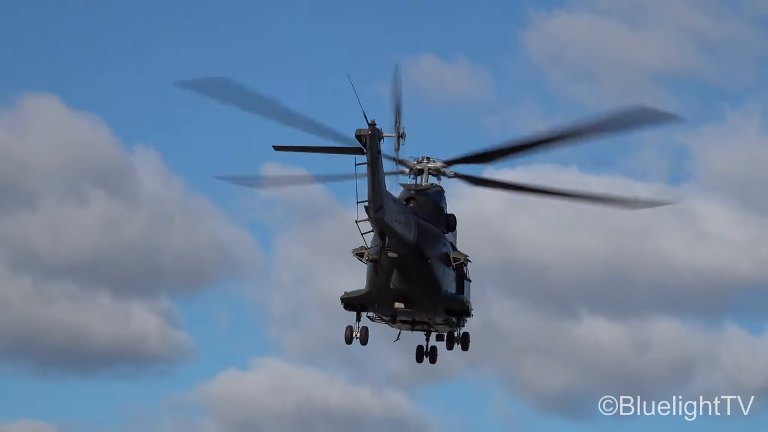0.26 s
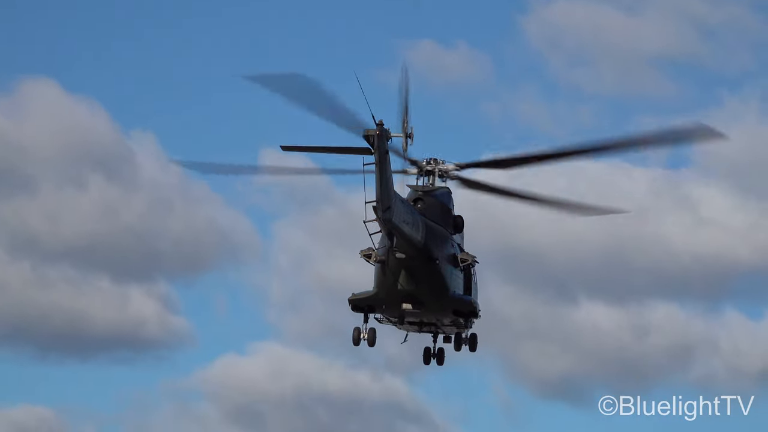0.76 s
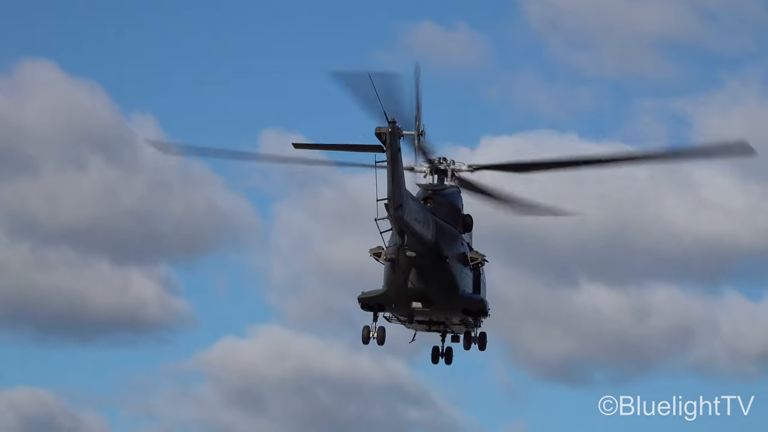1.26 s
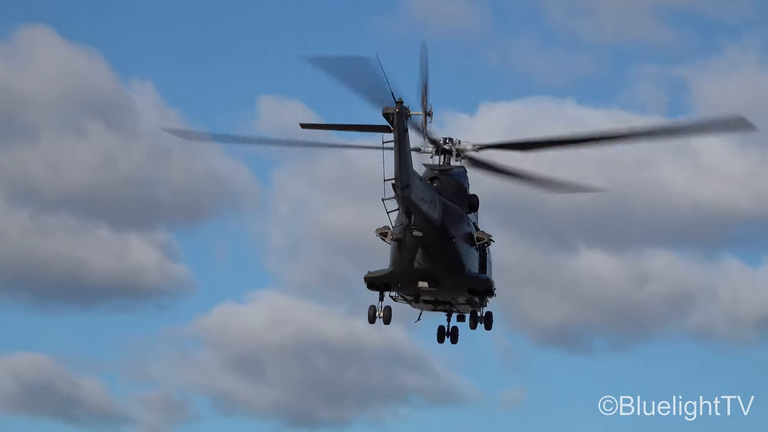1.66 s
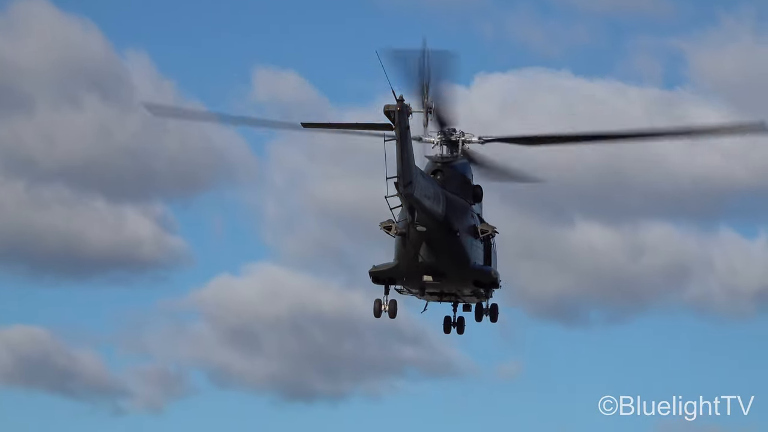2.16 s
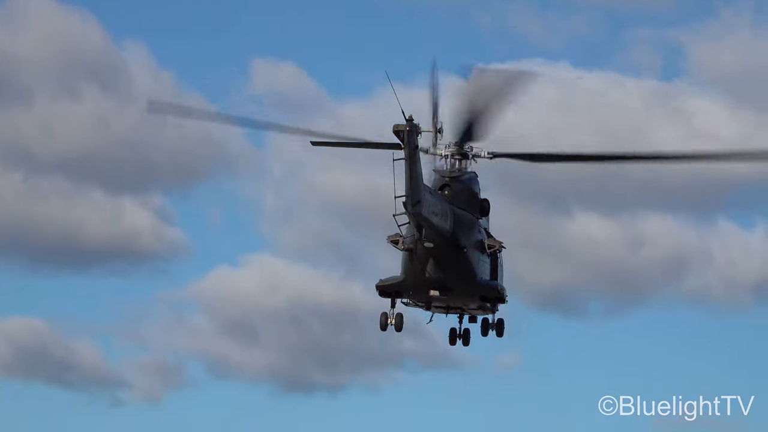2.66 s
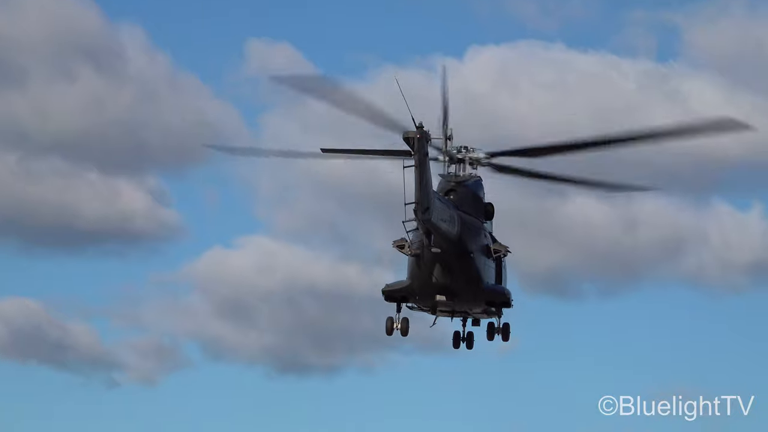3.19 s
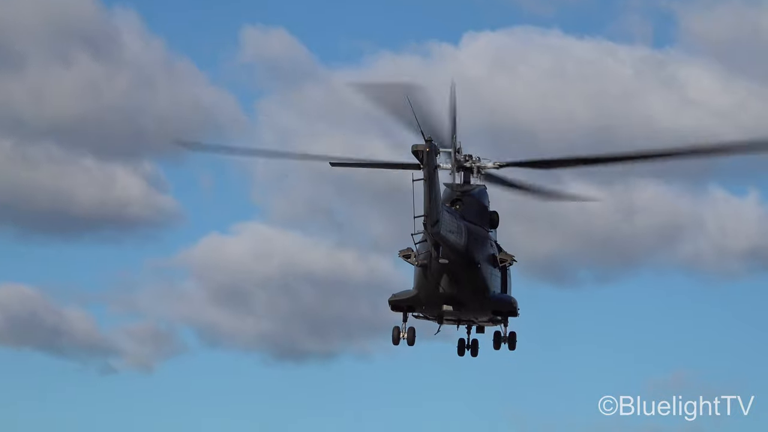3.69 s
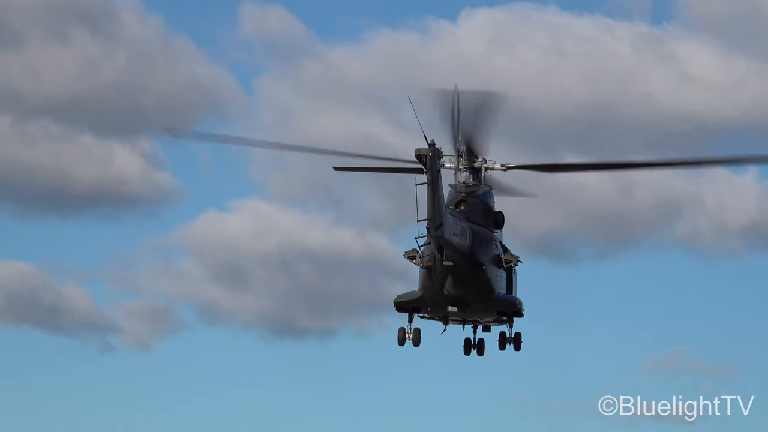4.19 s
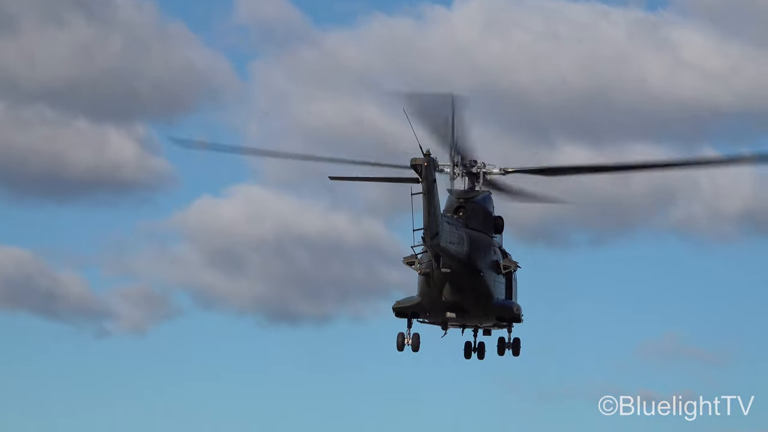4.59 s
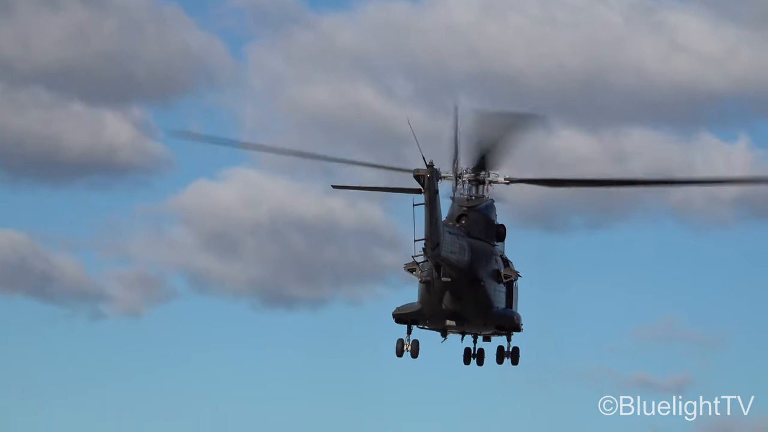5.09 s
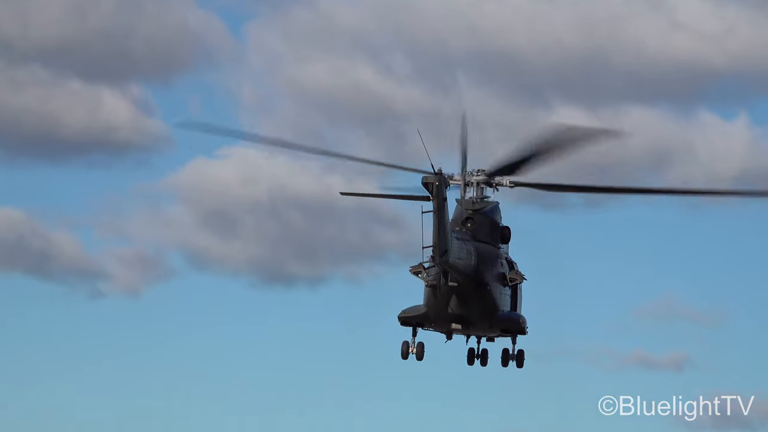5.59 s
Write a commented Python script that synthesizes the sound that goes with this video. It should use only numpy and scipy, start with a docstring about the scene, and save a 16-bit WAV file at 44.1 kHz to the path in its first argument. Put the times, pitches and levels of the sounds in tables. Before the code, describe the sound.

A large helicopter hovers low over open ground for about six seconds and slowly draws nearer. It starts with a breathy mid-range rotor rush pulsing nearly eighteen times a second, dipping in level and choking in tiny dropouts around 0.2-0.4 s. From 0.6 s hollow, knocking blade slaps join the beat, firm around 1-1.3 s, sparse around 1.5-1.9 s, loudest at 2.1-2.3 s, fading out by 2.6 s. Afterwards the roar is smoother, fuller and less deeply chopped, rising to its loudest at the end. Blurred gearbox and tail rotor whines waver inside it; a thin, breathy turbine whistle near 2.3 kHz grows more noticeable after 2.9 s, especially around 4.1 s. A dull ground echo colours the sound. Throughout, downwash batters the stereo microphones with uneven, saturated deep rumbles and thumps. Two more brief dropouts come near 4.7 and 4.85 s.

```python
"""Over an open field a helicopter hovers low and draws nearer. Rotor rush is banded noise that swells with each blade;
tail rotor and gearbox whine as noise in narrow resonances, and a thin turbine whistle wavers with them.
Some blades slap a tip vortex: pulsed bursts ring through resonances. The ground adds a dull echo.
Downwash rumbles on the microphone ports as saturated low noise. The aircraft drops out for brief dips at set
times where the capsules choke, and a limiter holds the loudest peaks."""
import sys
import numpy as np
from scipy import signal
from scipy.io import wavfile
from scipy.ndimage import uniform_filter1d, minimum_filter1d

SR = 44100
rng = np.random.default_rng(int(sys.argv[2]) if len(sys.argv) > 2 else 0)


def put_to_file(sound):
    """Save the sound as 16-bit audio at rate SR, in the file named by the first command-line argument."""
    columns = np.atleast_2d(sound).T  # one column per channel
    safe = np.clip(columns, -1, 1)
    whole_steps = np.round(safe * 32767)
    wavfile.write(sys.argv[1], SR, whole_steps.astype(np.int16))


N = 257984   # length in samples


def from_db(db):
    """Level in dB to amplitude factor."""
    return 10 ** (np.asarray(db) / 20)


def rms_one(x):
    """Scale to an rms of 1."""
    return x / np.sqrt(np.mean(x ** 2) + 1e-20)


def in_time(rows):
    """Draw each column of a timed table as a line through its points, one value per sample."""
    times_s, *columns = np.transpose(rows)
    return [np.interp(np.arange(N) / SR, times_s, column) for column in columns]


def at_hz(points, hz):
    """Read a frequency table at hz, on a logarithmic frequency axis."""
    table_hz, values = np.array(points).T
    return np.interp(np.log(hz), np.log(table_hz), values)


def drift(corner_hz):
    """Slow chance with spread 1: coarse noise through two equal one-pole low-passes."""
    step = 40   # samples between coarse points
    pole = np.exp(-2 * np.pi * corner_hz * step / SR)
    coarse = rng.standard_normal(N // step + 2002)
    slow = signal.lfilter([1], [1, -2 * pole, pole * pole], coarse)[2000:]   # settled part
    return np.interp(np.arange(N) / step, np.arange(len(slow)), rms_one(slow))


def resonate(x, hz, width_hz):
    """Two-pole resonance with gain 1 on top."""
    r = np.exp(-np.pi * width_hz / SR)
    feedback = [1, -2 * r * np.cos(2 * np.pi * hz / SR), r * r]
    return signal.lfilter([(1 - r * r) / 2, 0, (r * r - 1) / 2], feedback, x)


# How alike left and right are: f/Hz, likeness [0 unrelated to 1 identical]
STEREO_LIKENESS = [(15, 0.94), (60, 0.93), (125, 0.73), (220, 0.51), (320, 1), (450, 0.99), (800, 0.99),
                   (1500, 0.99), (2500, 0.94), (4500, 0.76), (8000, 0.53), (11000, 1), (14000, .97)]


def bands(spectrum, edges):
    """Yield centre Hz and a stereo noise band shaped by the spectrum; all bands together have rms 1."""
    centres = np.sqrt(edges[1:] * edges[:-1])
    gains = from_db(at_hz(spectrum, centres)) * np.sqrt(np.diff(edges))
    gains = gains / np.sqrt(np.sum(gains ** 2))
    white = rng.standard_normal((2, 2, N + SR // 2))   # neighbouring bands get unrelated noise
    for k, hz in enumerate(centres):
        sos = signal.butter(2, edges[k:k + 2], "band", fs=SR, output="sos")
        mid, side = signal.sosfilt(sos, white[k % 2])[:, SR // 2:]
        alike = np.clip(at_hz(STEREO_LIKENESS, hz), 0, 1)
        pair = np.sqrt(1 + alike) * mid + np.sqrt(1 - alike) * side * [[1], [-1]]
        yield hz, rms_one(pair) * gains[k]


BLADE_HZ, FIRST_BLADE_S = 17.64, 0.0004   # blade passages per second, start of the first
BEAT_PEAK, BEAT_SHARPNESS = 0.1, 3.5   # where in the passage the swell peaks (share), how pointed it is


def blade_beat():
    """A short swell at every blade passage, each blade with its own strength; mean 0, rms 1."""
    # the extra 1.5 turns put each swell mid-turn, so strength changes in the trough
    turns = (np.arange(N) / SR - FIRST_BLADE_S) * BLADE_HZ - BEAT_PEAK + 1.5
    strength = rng.uniform(.7, 1.3, int(turns[-1]) + 2)
    swell = np.exp(-BEAT_SHARPNESS * (1 + np.cos(2 * np.pi * turns)))
    swell = swell * strength[turns.astype(int)]
    return rms_one(swell - swell.mean())


TAIL_BLADE_HZ, TAIL_CHOP_DB = 106.4, 1.0   # tail blade passages per second, peak swing they give the treble
# Colour of blade and exhaust noise: f/Hz, relative level/dB per Hz
RUSH_SPECTRUM = [(130, -30), (220, -1.5), (300, 1), (450, -1.5), (650, -5), (780, -0.5), (950, -2.5),
                 (1300, -6), (1700, -11), (2200, -12), (3000, -18), (4800, -21), (6500, -25.5), (8500, -36),
                 (10000, -47), (12000, -51), (15500, -83)]
# Depth of the blade beat: t/s, level/dB (twice the rms swing; the treble swings less)
BEAT_DEPTH = [(0, 4), (.4, 2.5), (.7, 4), (1.0, 4.5), (1.3, 3.5), (1.7, 2), (2.2, 3.5), (2.9, 1.5),
              (4.5, 1.2), (4.75, 1.5), (5.2, 1), (5.85, 0)]


def rush(bright_db, roar_db, top_db, patchy_db):
    """Broad noise of blades and exhaust, beating with the blades and flickering in the moving air."""
    [depth_db] = in_time(BEAT_DEPTH)
    beat, together, swells, out = blade_beat(), drift(43), drift(4.3), 0
    # the tail blades chop the hiss, at a slightly wandering phase
    tail = np.sin(2 * np.pi * TAIL_BLADE_HZ * np.arange(N) / SR + 1.7 * drift(0.88))
    for hz, noise in bands(RUSH_SPECTRUM, edges=200 * 2 ** np.arange(0, 6.4, .4)):
        # share of this band in the treble, the low roar and the top hiss
        treble = np.clip(np.log2(hz / 1200), 0, 2) / 2
        roar = np.exp(-(np.log2(hz / 620) / .35) ** 2)
        top = np.clip(np.log2(hz / 5500) / .6, 0, 1)
        beating_db = (1 - 0.69 * treble) * depth_db * beat / 2 + TAIL_CHOP_DB * treble * tail
        flicker_db = patchy_db * (0.96 * together + drift(25.0) + treble * swells)
        colour_db = treble * bright_db + roar * roar_db + top * top_db
        out = out + noise * from_db(beating_db + colour_db + flicker_db)
    return out


# Whine of tail rotor and gearbox: f/Hz, width/Hz of the narrower resonance, relative level/dB among the tones
WHINES = [(231, 14, -23), (350, 20, -18), (470, 7, -18), (1390, 10, -27), (1476, 8, -28), (1920, 14, -30),
          (2330, 260, -28), (8800, 900, -34), (590, 40, -15), (705, 25, -20), (1254, 24, -24),
          (4663, 270, -27.5), (7600, 500, -38)]


def tones(fading_db):
    """Each tone is noise in a narrow resonance; it wavers and fades on its own in the turbulent air."""
    out = 0
    for hz, width_hz, level_db in WHINES:
        narrow = resonate(rng.standard_normal(N), hz, width_hz)
        tone = resonate(narrow, hz, 3 * width_hz)
        out = out + from_db(level_db + fading_db * drift(1.46)) * rms_one(tone)
    return out


WHINE_DB = -0.5   # trim of all tones against the rush
# The aircraft draws nearer: t/s, rush level/dB, brightness/dB, low roar/dB, top hiss/dB
ROTOR_COURSE = [(0, -33.5, -0.5, -4, 6), (0.2, -38, -2.5, 2, -6), (0.33, -41.5, -1, 2, 4.5),
                (0.5, -37, 1.5, -2, -6), (0.7, -36, 0.5, 0.5, -8), (1.0, -34, -1.5, -0.5, -1),
                (1.25, -32, 0.5, -6, -2), (1.45, -34, 0.5, 0, -3), (1.57, -36, 2.5, 2, -4),
                (1.75, -34.5, 1.5, 1, -2), (2.1, -30.5, -2.5, -2.5, -3), (2.55, -33, 2, 3, -10),
                (2.9, -31, 1.1, 1.5, -2), (3.35, -32, -0.3, -1.5, -2.5), (3.5, -31, 0, -3, -1),
                (3.65, -30.5, 3, -2, -1.5), (3.88, -30.5, 0, 1, -8), (4.17, -28.5, 1, 3, 1),
                (4.4, -29, 2, -1, -8), (4.63, -29, 4.5, 2.5, -7), (4.72, -32.5, 0.5, -2.5, -5.5),
                (5.2, -30.5, -0.8, -0.5, -1), (5.5, -28, 1, -1, -6), (5.85, -27, -2, 1, 5)]


def rotor():
    """Rush and tones rise and fall on one level; the tones also swell with the low roar."""
    rush_db, bright_db, roar_db, top_db = in_time(ROTOR_COURSE)
    broad = rush(bright_db, roar_db, top_db, patchy_db=.8)
    whine = from_db(WHINE_DB + roar_db) * tones(fading_db=2.5)
    return from_db(rush_db) * (broad + whine)


TURBINE_HZ, TURBINE_WIDTH_HZ = 2323, 30   # pitch, width of the narrower resonance
# Turbine whistle, before its random waver: t/s, level/dB
WHISTLE_LEVEL = [(0, -60), (.5, -61), (1.2, -56), (1.6, -58), (2.0, -53), (2.3, -55), (2.6, -60),
                 (2.9, -51), (3.3, -56), (3.5, -52), (3.8, -49), (3.95, -52), (4.12, -47), (4.4, -52),
                 (4.55, -49), (4.8, -53), (5.1, -51), (5.3, -56), (5.5, -50), (5.85, -48)]


def turbine():
    """A thin whistle of doubly resonant noise that swells and breaks up in the turbulent air."""
    narrow = resonate(rng.standard_normal(N), TURBINE_HZ, TURBINE_WIDTH_HZ)
    whistle = resonate(narrow, TURBINE_HZ, 3 * TURBINE_WIDTH_HZ)
    [level_db] = in_time(WHISTLE_LEVEL)
    return from_db(level_db + 1.5 * drift(9.0)) * rms_one(whistle)


ECHO_DB = -11
# Delay of the ground echo, which goes with the aircraft's height: t/s, lag/ms
GROUND_LAG = [(0, 1.59), (1, 1.59), (2, 1.63), (3, 1.58), (4, 1.416), (5.85, 1.43)]


def over_ground(x):
    """The ground returns a dull echo at a slowly changing lag, combing the sound."""
    [lag_ms] = in_time(GROUND_LAG)
    dull = signal.sosfilt(signal.butter(2, 1500, fs=SR, output="sos"), x)
    read_at = np.arange(N) - lag_ms * SR / 1000
    echo = np.array([np.interp(read_at, np.arange(N), channel) for channel in dull])
    return x + from_db(ECHO_DB) * echo


LEAN_DB, LEAN_SWAY_DB = -1.5, 1.6   # buffet left over right, and the spread of its sway
SATURATION = .84   # largest swing of the capsules in the buffet
# Gusts on the ports: t/s, buffet level/dB, edge/dB per octave about 45 Hz
GUST_COURSE = [(0.0, -6, 0.5), (0.18, -7.5, 0.5), (0.21, -3.5, -2.5), (0.3, -2, 0), (0.45, -6, 2),
               (0.55, -8, -2), (0.58, -18.5, 0), (0.75, -18.5, 4.5), (0.78, -12, -4.5), (0.85, -17, 4.5),
               (0.9, -7.5, -2.5), (0.99, -15, 1), (1.22, -4.5, -2), (1.25, -22, -2), (1.32, -14.5, -0.5),
               (1.42, -4, -13.5), (1.5, -22, 8.5), (1.53, -5, -2.5), (1.62, -10.5, -5), (1.72, -12, 0.5),
               (1.87, -14.5, 2), (2.0, -5, -2.5), (2.12, -9.5, -2.5), (2.3, -8, 0), (2.45, -5.5, 2),
               (2.55, -10, 0.5), (2.68, -10.5, -6), (2.78, -13.5, -7), (2.88, -11, -5), (3.01, -8.5, -6.5),
               (3.2, -6, 1), (3.32, -4.5, -1), (3.39, -10.5, -2), (3.42, -6.5, -1), (3.52, -9, -5),
               (3.57, -16, 3.5), (3.73, -3.5, -5.5), (3.76, -22, 4), (3.8, -11.5, -5.5), (3.84, -23, 7.5),
               (4.1, -13.5, -2.5), (4.15, -21, -1), (4.22, -3.5, -4), (4.32, -6.5, -2), (4.5, -11, -11.5),
               (4.54, -18.5, 0), (4.64, -14, -1.5), (4.68, -4, -4), (4.92, -5, 1.5), (4.95, -5, 2.5),
               (5.0, -14.5, -14), (5.2, -10, -2), (5.3, -19, -1.5), (5.39, -6.5, 3), (5.56, -15, -4),
               (5.59, -8.5, -11), (5.67, -19, 2.5), (5.74, -11.5, -5), (5.78, -18.5, -2.5), (5.85, -6, -1)]
# Colour of the buffet: f/Hz, relative level/dB per Hz
BUFFET_SPECTRUM = [(4.7, -31), (8.0, 5), (20, 1.5), (34, -2.5), (89, -11), (253, -40.5), (400, -30),
                   (520, -65), (880, -120)]
# Buffet left over right, on top of the lean: f/Hz, level/dB
BUFFET_BALANCE = [(20, 3.5), (60, 3.5), (130, -5), (300, -2.5)]


def downwash(lumpy_db):
    """Turbulence on the ports: lumps of low noise, the upper bands coming and going with the edge of the gust."""
    buffet_db, edge_db = in_time(GUST_COURSE)
    swing_db = edge_db + lumpy_db * drift(12.0)
    lean_db = LEAN_DB + LEAN_SWAY_DB * drift(1.0)
    out = 0
    for hz, noise in bands(BUFFET_SPECTRUM, edges=8 * 2 ** np.arange(0, 6, .5)):
        upper = np.clip(np.log2(hz / 45), -.6, 1.8)   # octaves above 45 Hz
        balance_db = lean_db + at_hz(BUFFET_BALANCE, hz)
        out = out + noise * from_db(upper * swing_db + drift(3.0) + balance_db * [[.5], [-.5]])
    pushed = out * from_db(buffet_db + lumpy_db * drift(4.3))
    squeezed = SATURATION * np.tanh(pushed / SATURATION)   # the capsules run out of travel
    return signal.sosfilt(signal.butter(4, 320, fs=SR, output="sos"), squeezed)


# Dips where the capsules choke: t/s of the centre, length/s between the points at 1/e of the depth, depth/dB
CHOKE_DIPS = [(0.209, 0.008, 20), (0.259, 0.014, 15), (0.292, 0.006, 8), (0.392, .012, 5), (1.56, .03, 4),
              (3.32, .007, 4), (4.686, 0.012, 20), (4.842, 0.015, 19)]


def choking():
    """Gain of the far sound: a short bell-shaped dip in dB for each choke."""
    t = np.arange(N) / SR
    dips_db = sum(depth_db * np.exp(-(2 * (t - s) / length_s) ** 2) for s, length_s, depth_db in CHOKE_DIPS)
    return from_db(-dips_db)


BURST_T60_S, BURST_RISE_S = 0.024, 0.002   # decay by 60 dB, rise constant
KNOCK_DB = 17   # leading pulse against the noise
CRACK_HZ = 3230   # bright edge of a slap
THUMP_HZ, THUMP_DB, THUMP_LAG_S = 560, -8, .003   # low body: pitch, peak against the hollow part, delay
# Blade slaps: t/s of the onset, peak level/dB of the hollow part, its f/Hz, crack level/dB against it
BLADE_SLAPS = [(0.628, -31, 1090, -14), (0.740, -32, 1180, -6), (0.797, -30, 1170, -14),
               (0.854, -35, 1190, -14), (0.914, -28, 1050, -21), (0.966, -28, 1140, -20),
               (1.023, -25, 1070, -16), (1.082, -23.5, 1210, -20), (1.139, -30, 800, -5),
               (1.195, -23, 930, -8), (1.255, -21, 1050, -16), (1.305, -21.5, 1310, -8.5),
               (1.366, -41, 1000, -14), (1.592, -33, 1320, -7), (1.648, -35, 1920, 4),
               (1.871, -26, 1500, -5), (1.985, -20.5, 970, -10), (2.042, -23.5, 1100, -5),
               (2.099, -17, 1070, -8), (2.156, -21.5, 1380, -18), (2.2105, -14.5, 1390, -25),
               (2.269, -16.5, 1140, -21), (2.325, -21, 1200, -17), (2.382, -23, 1070, -10),
               (2.437, -30, 1140, -9), (2.494, -25, 1150, -4), (2.551, -34.5, 1550, 4)]


def slaps():
    """A blade meets a tip vortex: a knock, then some milliseconds of uneven pulses in a hollow band over a low thump."""
    out, t = np.zeros(N), np.arange(2000) / SR
    envelope = (1 - np.exp(-t / BURST_RISE_S)) * from_db(-60 * t / BURST_T60_S)
    for s, peak_db, hz, crack_db in BLADE_SLAPS:
        burst = rng.standard_normal(len(t)) * envelope
        burst[0] += from_db(KNOCK_DB)
        late = np.roll(burst, round(THUMP_LAG_S * SR))
        hollow = resonate(resonate(resonate(burst, hz, width_hz=600), hz, width_hz=800), hz, width_hz=1000)
        crack = resonate(resonate(burst, CRACK_HZ, width_hz=1000), CRACK_HZ, width_hz=1700)
        thump = resonate(resonate(late, THUMP_HZ, width_hz=250), THUMP_HZ, width_hz=350)
        parts = [(hollow, 0), (crack, crack_db), (thump, THUMP_DB)]
        slap = sum(from_db(db) * part / np.abs(part).max() for part, db in parts)
        out[round(s * SR):][:len(t)] += from_db(peak_db) * slap
    return out


def limited(x, top, release_db_per_s):
    """Limiter for both channels: it looks a few ms ahead of each peak and lets go at a steady rate."""
    over_db = np.maximum(20 * np.log10(np.abs(x).max(axis=0) / top + 1e-9), 0)
    fall_db = release_db_per_s * np.arange(N) / SR
    held_db = np.maximum.accumulate(over_db + fall_db) - fall_db
    held_db = -minimum_filter1d(-held_db, size=441)   # widest reduction within 10 ms, centred
    return x * from_db(-uniform_filter1d(held_db, size=441))


def scene():
    """Aircraft over the ground, heard through the buffeted microphone."""
    aircraft = over_ground(rotor() + turbine() + slaps())
    return aircraft * choking() + downwash(lumpy_db=1.2)


CUTOFF_HZ = 15700   # from here up the treble is 70 dB down


def record(dry):
    """The limiter holds the peaks under the top of the range, then a steep low-pass cuts the treble."""
    held = limited(dry, top=.86, release_db_per_s=200)
    cut = signal.cheby2(12, 70, CUTOFF_HZ, fs=SR, output="sos")
    settled = signal.sosfilt_zi(cut)[:, None, :] * held[None, :, :1]   # no click at the start
    return signal.sosfilt(cut, held, zi=settled)[0]


dry = scene()
out = record(dry)
put_to_file(out)
```